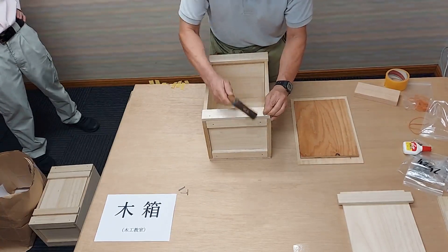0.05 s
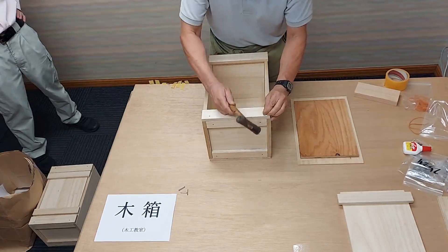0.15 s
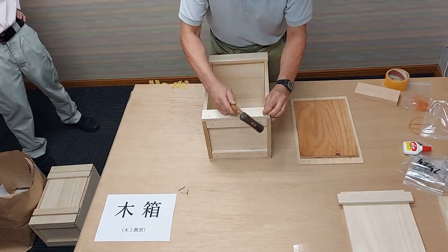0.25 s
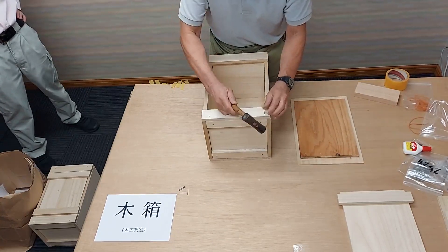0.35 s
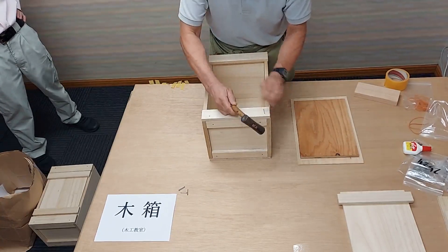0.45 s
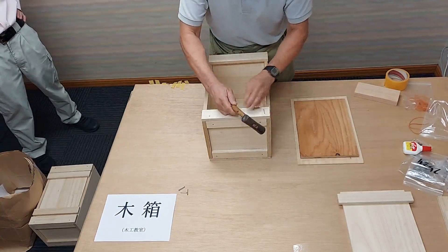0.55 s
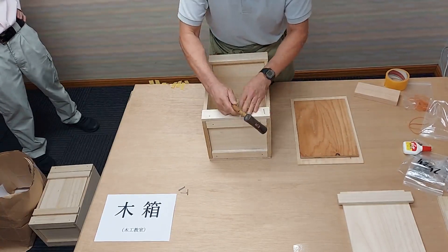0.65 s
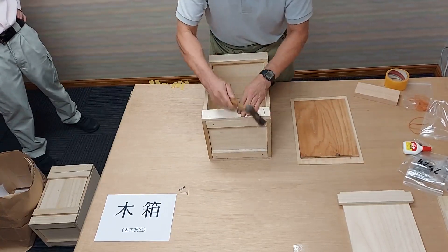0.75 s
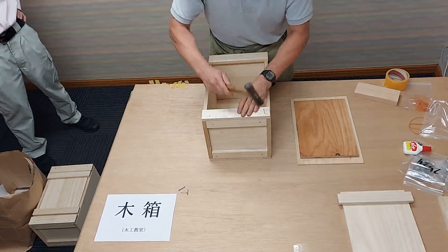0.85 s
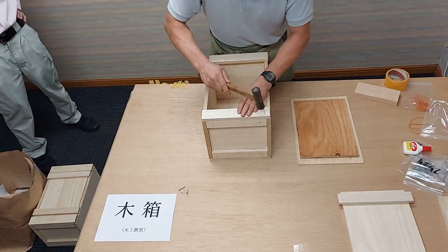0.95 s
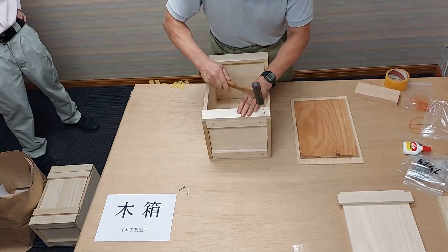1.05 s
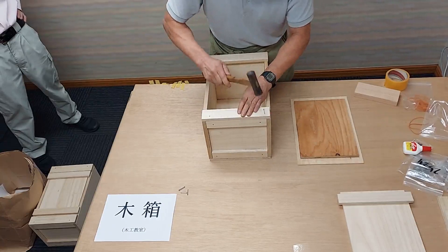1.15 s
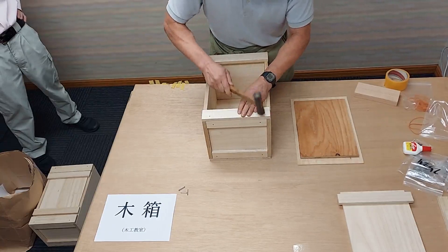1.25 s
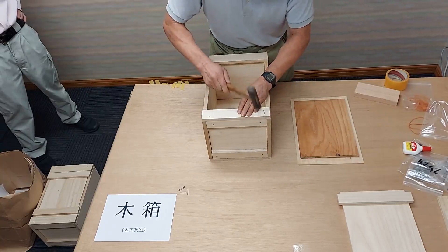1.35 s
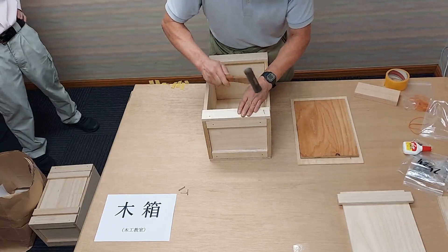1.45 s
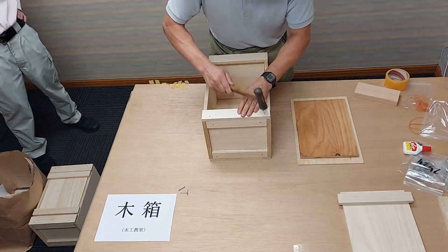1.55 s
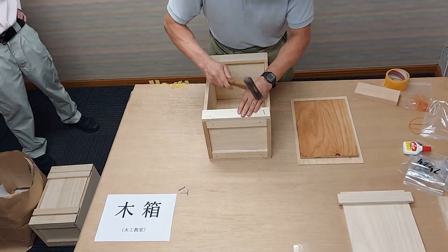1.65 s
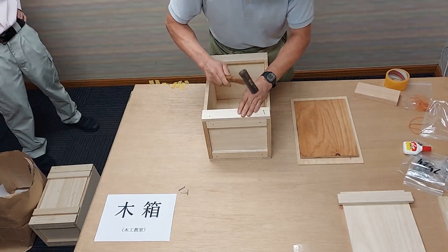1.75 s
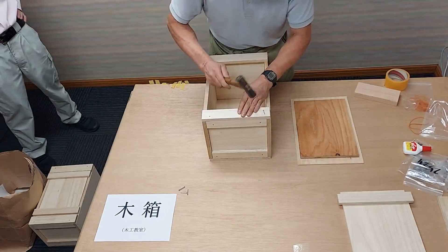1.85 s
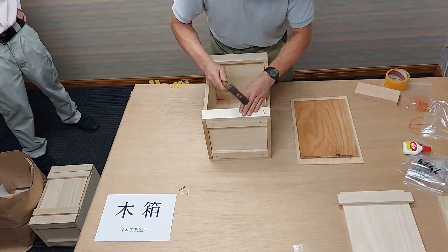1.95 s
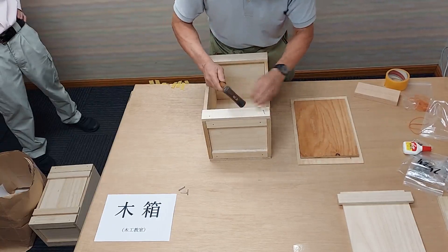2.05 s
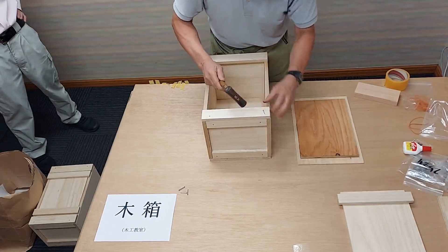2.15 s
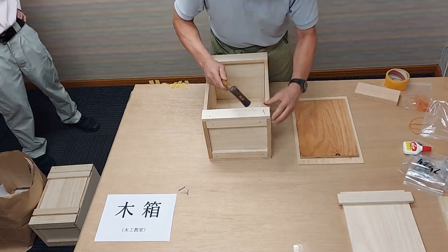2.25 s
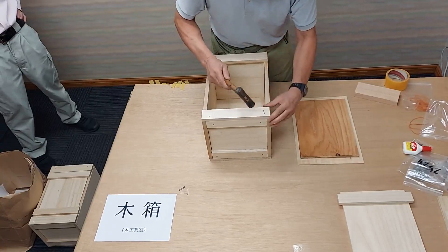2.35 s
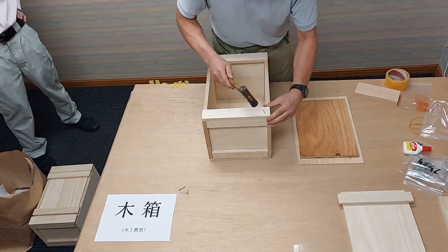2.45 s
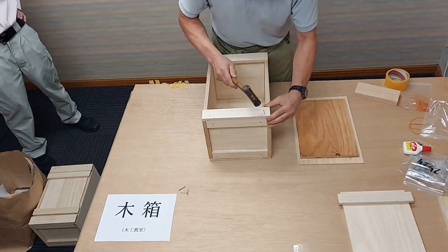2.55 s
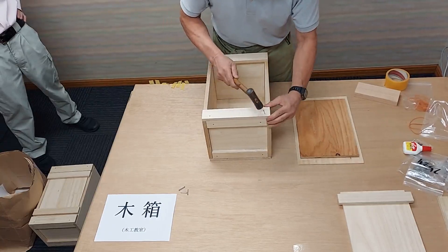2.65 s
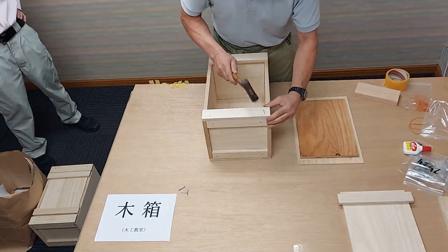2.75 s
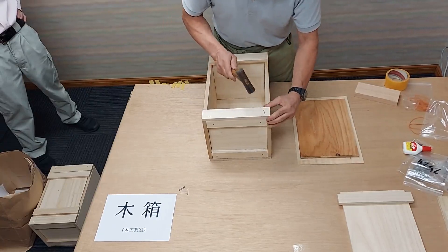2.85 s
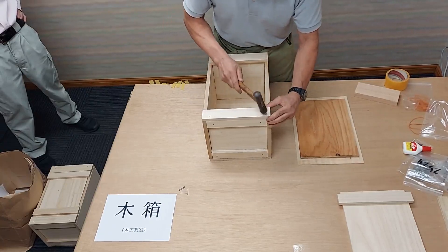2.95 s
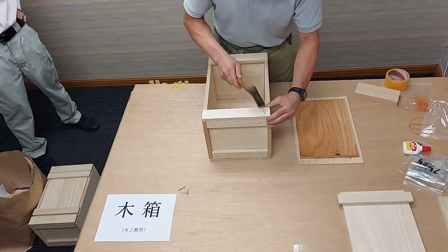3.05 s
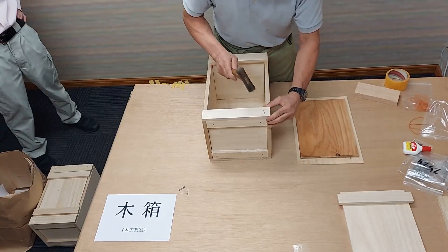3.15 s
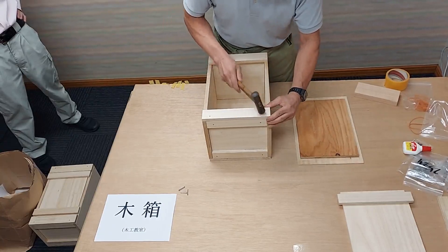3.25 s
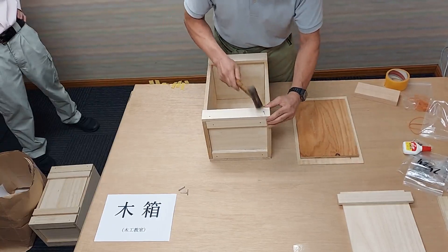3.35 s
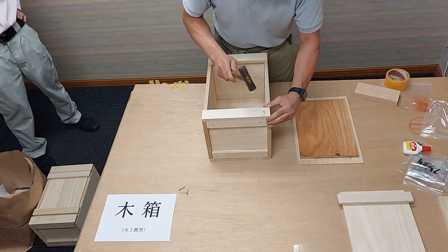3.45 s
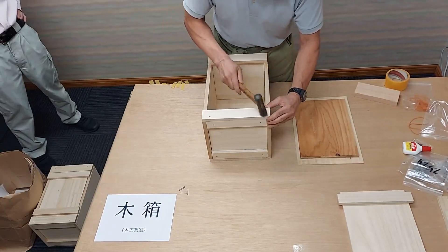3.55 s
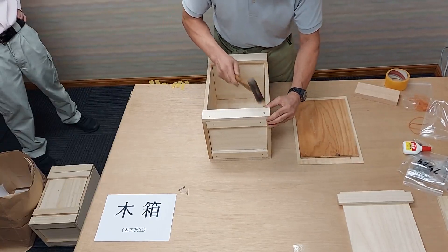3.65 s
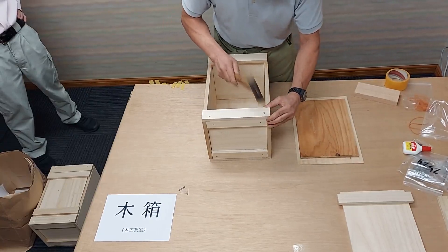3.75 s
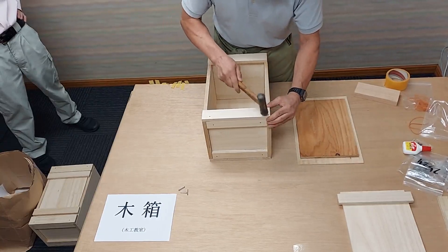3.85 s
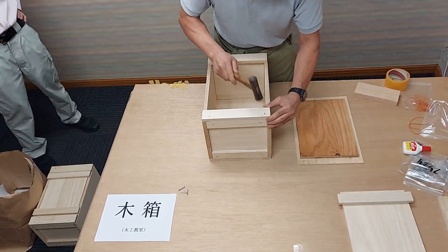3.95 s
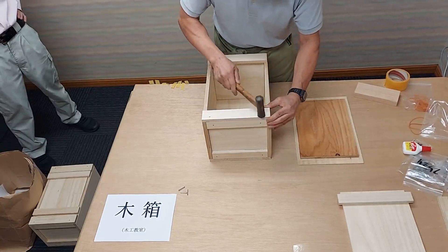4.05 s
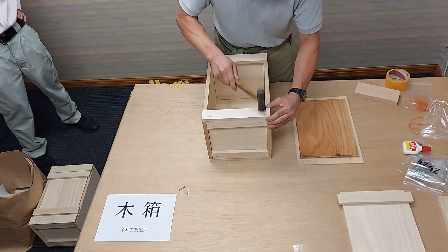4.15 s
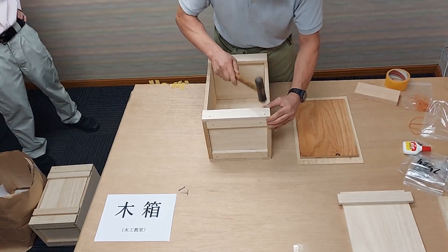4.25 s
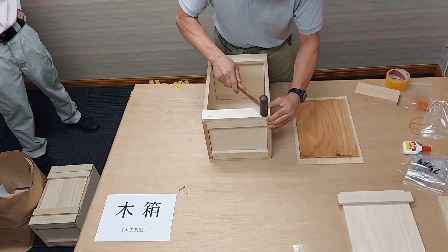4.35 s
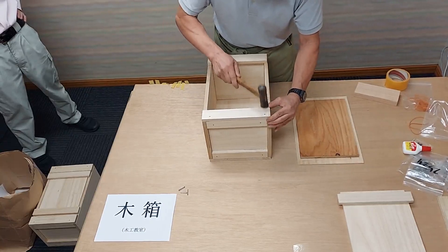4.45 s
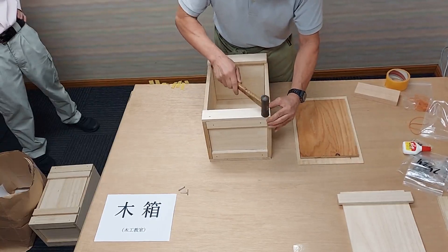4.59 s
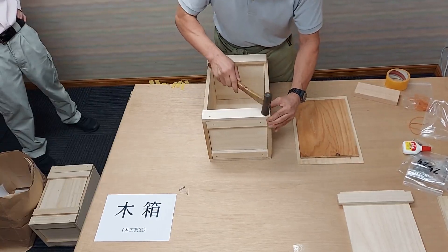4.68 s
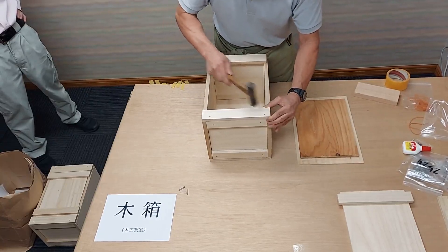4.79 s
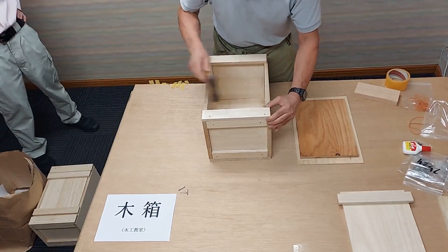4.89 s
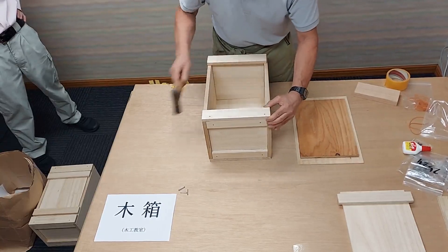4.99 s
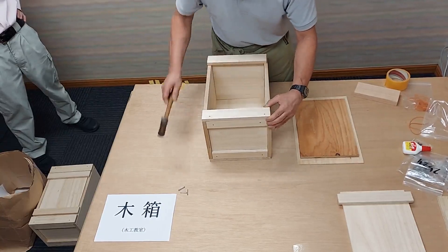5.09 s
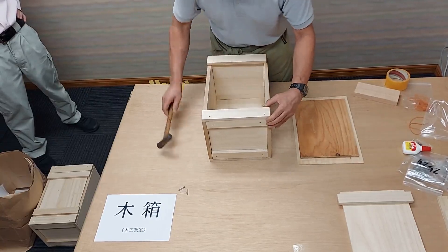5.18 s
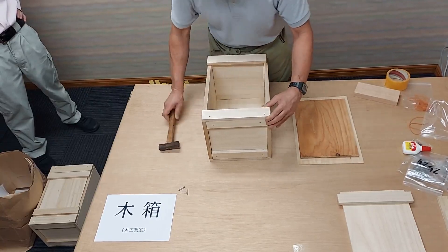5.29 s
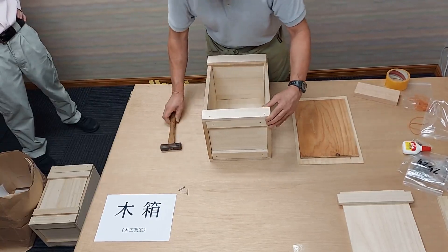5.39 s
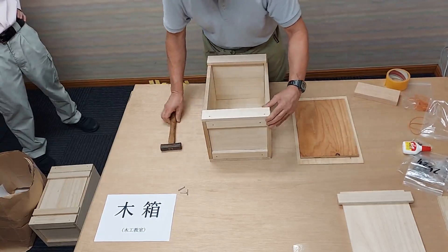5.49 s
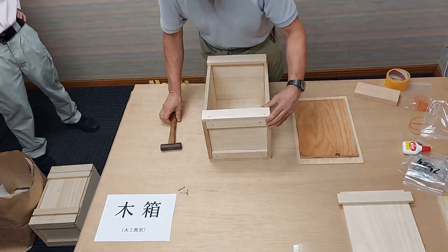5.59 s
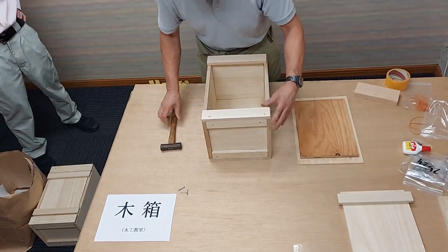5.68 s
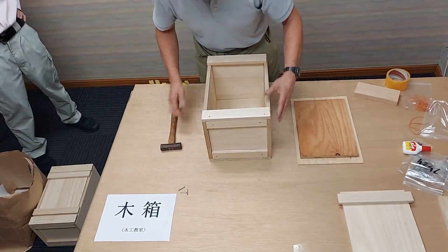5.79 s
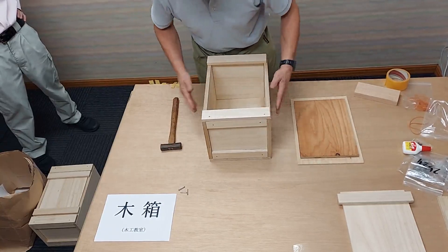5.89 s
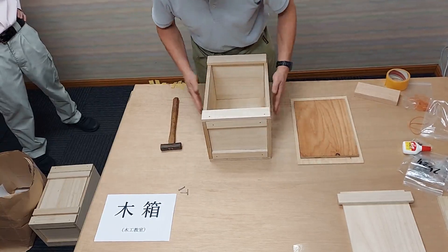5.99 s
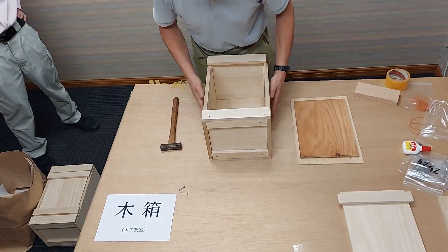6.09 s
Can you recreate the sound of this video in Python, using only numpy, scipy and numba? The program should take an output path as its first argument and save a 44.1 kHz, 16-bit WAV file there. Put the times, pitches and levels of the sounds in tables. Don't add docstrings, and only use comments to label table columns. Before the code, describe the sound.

In a small carpeted room, a table bump and soft handling come first, then two quick hammer blows on a hollow wooden box. After a pause with faint brushing, seven evenly spaced blows follow, cracking brightly and booming through the table. The hammer is then set down with a light double touch and a thud. A fan hums behind, dipping after loud hits; close stereo recorder.

```python
import sys
import numpy as np
from scipy import signal
from scipy.fft import rfft, irfft
from scipy.io import wavfile
from scipy.ndimage import uniform_filter1d
from numba import njit

SR = 44100
rng = np.random.default_rng(int(sys.argv[2]) if len(sys.argv) > 2 else 0)


def amplitude_ratio(level_db):
    exponent = np.asarray(level_db, float) / 20
    return 10 ** exponent


def transcribe(u):
    v = np.clip(np.atleast_2d(u).T, -1, 1)
    q = np.round(v * 32767).astype(np.int16)
    wavfile.write(sys.argv[1], SR, q)


N = 270112

# t/s, peak level/dB, table boom/dB, hollow box/dB, bright crack/dB
BLOWS = [
    (1.32, 0, -7.5, -1, 2.5),
    (1.61, -1, -5.5, -1, 2.5),
    (3.032, 0.5, -4, -4.5, 3.5),
    (3.332, 1, -4.5, -3, 4),
    (3.602, -0.5, -6.5, -3, 3.5),
    (3.861, -2, -5.5, 1, 3.5),
    (4.116, 1.5, -8.5, 5.5, 1),
    (4.381, 0.5, -10, -2, 3),
    (4.635, 1.5, -11, 6.5, 4),
]
# f/Hz, side minus middle level/dB
ROOM_SIDE = [(60, 5), (150, -9), (300, -12.5), (600, -1), (1200, -2), (3000, 0.5), (14000, 1.5)]
HZ = np.maximum(np.arange(2049) * SR / 4096, 20)
OPPOSITE = np.array([[1], [-1]])
BASS_LEAD = 0.38
BLOW_EARLY_S = 0.0004


def on_log(points, hz):
    p = np.array(points)
    return np.interp(np.log(hz), np.log(p[:, 0]), p[:, 1])


def causal(db):
    cep = irfft(db * np.log(10) / 20)
    half = len(cep) // 2
    cep = np.r_[cep[0], 2 * cep[1:half], np.zeros(half)]
    return irfft(np.exp(rfft(cep)))[:half]


def band(x, lo_hz, hi_hz):
    return signal.sosfilt(signal.butter(2, [lo_hz, hi_hz], "band", fs=SR, output="sos"), x)


def unit(x):
    return x / np.sqrt(np.sum(x ** 2))


def fade(t, t60):
    return np.exp(-np.log(1000) * t / t60)


def add(out, s, x):
    i = int(s * SR)
    out[..., i:i + x.shape[-1]] += x[..., :N - i]


def walk(rate):
    hold = int(SR / rate)
    steps = np.repeat(rng.standard_normal(500), hold)[:N]
    return 1.3 * uniform_filter1d(steps, hold)


def ducking():
    rest_db, duck_db, deepest_db = 11, 5.5, 19
    sink_s, recover_s = 0.13, 1.3
    since = np.maximum(np.arange(N) / SR - np.array(BLOWS)[:, :1], 0)
    dips = np.exp(-since / recover_s) * (1 - np.exp(-since / sink_s))
    drop = duck_db * np.sum(dips, axis=0)
    return rest_db - deepest_db * np.tanh(drop / deepest_db)


def rumble():
    # t/s, level/dB
    footsteps = [(0.0, -34), (0.15, -48), (0.251, -48), (0.796, -47.5), (0.96, -49.5), (1.15, -47.5),
                 (1.291, -52), (2.1, -61), (2.58, -56), (2.65, -61.5), (2.829, -64), (5.018, -56.5),
                 (5.47, -56.5), (5.71, -59), (6.1, -59.5)]
    building_db, swell_s = -69.5, 0.026
    t = np.arange(N) / SR
    turn = 2 * np.pi * np.cumsum(62 + 5 * walk(42)) / SR
    hum = np.sin(turn + BASS_LEAD * OPPOSITE) * amplitude_ratio(1.3 * walk(29))
    low = band(rng.standard_normal(N), 49, 140)
    steps = sum(amplitude_ratio(db) * np.exp(-((t - s) / swell_s) ** 2) for s, db in footsteps)
    steady = amplitude_ratio(building_db + ducking() + 3.1 * walk(16))
    return (hum + 0.43 * low / np.std(low)) * (steps + steady)


def fan():
    # f/Hz, level/dB per Hz
    air_colour = [(53, -25), (90, -3), (145, -21), (176, -10), (239, -11), (385, -11.5), (410, -9.5),
                  (467, -12), (647, -15.5), (1410, -23.5), (1570, -24), (2090, -37.5), (2380, -19.5),
                  (2830, -44.5), (16000, -55)]
    # f/Hz, level/dB
    whine_lines = [(414.5, -76.5), (635.2, -80), (877.5, -79), (1044, -83), (1464, -90.5), (1545, -72),
                   (2245, -88), (2293, -75), (2358, -79), (2433, -82.5), (2498, -83.5), (2552, -87.5)]
    air_db = -70
    hz = np.maximum(np.fft.rfftfreq(N, 1 / SR), 20)
    mid, side = irfft(rfft(rng.standard_normal((2, N))) * amplitude_ratio(on_log(air_colour, hz)), N)
    side = irfft(rfft(side) * amplitude_ratio(on_log(ROOM_SIDE, hz)), N)
    air = np.array([mid + side, mid - side]) * amplitude_ratio(air_db) / np.std(mid)
    t = np.arange(N) / SR
    for f, db in whine_lines:
        wobble = np.cumsum(3.2 * walk(50)) / SR
        start = rng.random((2, 1)) * min(f / 2000, 1)
        phase = 2 * np.pi * (f * t + wobble + start)
        air += amplitude_ratio(db - 1.5 + 2.2 * walk(74)) * np.sin(phase)
    return air * amplitude_ratio(ducking())


def room():
    # f/Hz, t60/s
    echo_t60 = [(60, 0.23), (130, 0.47), (350, 0.45), (920, 0.37), (2400, 0.29), (6400, 0.27),
                (14000, 0.18)]
    t = np.arange(SR) / SR
    cuts = 40 * 2 ** np.arange(0, 9, .5)
    tail = 0
    for lo, hi in zip(cuts[:-1], cuts[1:]):
        mid, side = band(rng.standard_normal((2, SR)), lo, hi)
        t60 = on_log(echo_t60, lo)
        wide = amplitude_ratio(on_log(ROOM_SIDE, max(lo, 150))) * OPPOSITE
        decay = fade(t, t60) + 3.8 * fade(t, 0.54 * t60)
        tail = tail + (mid + wide * side) * decay / np.sqrt(t60) * min(lo / 180, 1)
    tail = unit(tail * (1 - np.exp(-t / 0.0046)))
    tail[:, 0] -= amplitude_ratio(-21)
    return tail * amplitude_ratio(np.array([[.4], [-.4]]))


def wood():
    # f/Hz, level/dB, t60/s
    box_notes = [(295, -16, 0.27), (336.1, -14.5, 0.23), (419.3, -14, 0.18), (474.6, -7.5, 0.087),
                 (536, -0.5, 0.08), (628, -13.5, 0.22), (699.6, -0.5, 0.047), (879, -2, 0.045),
                 (926, -6, 0.08), (1042, -4.5, 0.081), (1095, -3, 0.031), (2130, -8.5, 0.1),
                 (5030, 3, 0.0068), (6780, -1, 0.031)]
    # f/Hz, level/dB, t60/s, split/Hz
    boom_pairs = [(62, -1.5, 0.27, 11), (82.1, -11.5, .4, 8), (98.73, 0.5, 0.22, 7.2),
                  (123.3, -4.5, 0.31, 7.6), (169.4, 1, 0.22, 7.7), (228.3, -8.5, 0.26, 12)]
    t = np.arange(SR // 2) / SR
    lead = rng.uniform(-1.3, 1, (len(box_notes), 2, 1))
    box = 0
    for (hz, db, t60), p in zip(box_notes, lead):
        box = box + amplitude_ratio(db) * np.sin(2 * np.pi * hz * t + .7 * p) * fade(t, t60)
    boom = 0
    for hz, db, t60, split_hz in boom_pairs:
        turn = 2 * np.pi * hz * t + BASS_LEAD * 65 / hz * OPPOSITE
        beat = np.pi * split_hz * t
        pair = np.sin(turn + beat) - .7 * np.sin(turn - beat)
        boom = boom + amplitude_ratio(db) * pair * fade(t, t60)
    return amplitude_ratio(-37.5) * box * (1 - np.exp(-t / .002)) + amplitude_ratio(-40.5) * boom


def contact(length, rattle_db, size):
    rattle = rng.standard_normal(size) * np.exp(-np.arange(size) / SR / length)
    return np.r_[1, amplitude_ratio(rattle_db) * unit(rattle)]


def taps(rows, below, above):
    out = np.zeros(N)
    for s, db, hz, length in rows:
        octaves = np.abs(np.log2(HZ / hz))
        colour = -np.where(HZ < hz, below, above) * octaves ** 2 / (octaves + 0.18)
        push = contact(length, -2, size=8000)
        add(out, s, amplitude_ratio(db + 38) * unit(signal.fftconvolve(push, causal(colour))))
    return out


def handling():
    # t/s, level/dB, centre f/Hz, contact
    # length/s
    thuds = [
        (0.002, -38, 122, 0.014),
        (0.221, -40, 170, 0.032),
        (0.738, -49.5, 173, 0.026),
        (2.047, -58.5, 180, .04),
        (2.540, -56.5, 180, 0.012),
        (5.434, -32, 237, 0.01),
        (5.688, -47, 196, 0.022),
    ]
    # t/s, level/dB, centre f/Hz, contact length/s
    knocks = [
        (0.343, -65.5, 500, 0.046),
        (2.545, -55.5, 479, 0.008),
        (5.351, -38.5, 390, 0.013),
        (5.377, -43.5, 387, 0.012),
        (5.433, -29, 646, 0.012),
        (5.686, -40.5, 920, 0.041),
    ]
    # t/s, level/dB, centre f/Hz, contact
    # length/s
    scuffs = [
        (0.001, -48.5, 1190, 0.0067),
        (0.002, -66.5, 6800, 0.045),
        (0.345, -78, 8950, 0.066),
        (0.74, -59, 1500, 0.04),
        (0.785, -78, 7000, .04),
        (1.892, -60, 1512, 0.079),
        (2.870, -60.5, 920, 0.11),
        (5.357, -69.5, 5000, 0.035),
        (5.434, -56, 1800, 0.032),
        (5.687, -50.5, 1900, 0.046),
    ]
    return taps(thuds, 21, 16) + taps(knocks, 8.1, 17.7) + taps(scuffs, 2.5, 17)


def steel():
    # t/s, f/Hz, level/dB, t60/s
    head_notes = [
        (3.034, 3370, -58, .6),
        (4.636, 3370, -48, .6),
        (5.690, 4060, -53, .17),
    ]
    out, t = np.zeros(N), np.arange(SR) / SR
    for s, hz, db, t60 in head_notes:
        note = np.sin(2 * np.pi * hz * t) * fade(t, t60)
        add(out, s, amplitude_ratio(db) * note * (1 - np.exp(-t / .005)))
    return out


def cracks():
    out, t = np.zeros((2, N)), np.arange(600) / SR
    burst = np.exp(-t / .0015) * (1 - np.exp(-t / .0005))
    for s, db in np.array(BLOWS)[:, :2]:
        mid, side = rng.standard_normal((2, len(t))) * burst
        chatter = np.array([mid + .6 * side, mid - .6 * side])
        add(out, s - BLOW_EARLY_S, amplitude_ratio(db - 3.5) * band(chatter, 3800, 8500))
    return out


def hammer():
    # f/Hz, level/dB per Hz
    blow_colour = [(30, -25.5), (60, -5.5), (160, -1), (300, -3.5), (700, -4.5), (1200, -7), (2200, -8),
                   (4500, -18), (8000, -25.5), (11000, -33), (15000, -29.5), (16800, -59.5)]
    overdrive_db, spot_db = 6, 1.8
    out, octaves = np.zeros(N), np.log2(HZ)
    hollow = np.exp(-((octaves - np.log2(460)) / .5) ** 2)
    hollow = hollow - .45 * np.exp(-((octaves - np.log2(800)) / .25) ** 2)
    for s, db, boom_db, hollow_db, crack_db in BLOWS:
        push = np.r_[amplitude_ratio(-18), np.zeros(52), contact(.014, -7, size=3000)]
        tilt = [(110, boom_db), (170, -6), (300, 0.7), (2000, -1.36), (5000, crack_db)]
        spot = np.interp(octaves, np.arange(8, 14, .2), rng.standard_normal(30)) * (HZ > 250)
        colour = on_log(blow_colour, HZ) + on_log(tilt, HZ)
        colour = colour + hollow_db * hollow + spot_db * spot
        blow = unit(np.convolve(push, causal(colour)))
        add(out, s - BLOW_EARLY_S, amplitude_ratio(db + overdrive_db + 23.5) * blow)
    return out


def scene():
    blows, soft = hammer(), handling()
    tap_ring_db, tap_direct_db = -16.5, -13
    wet = signal.fftconvolve((blows + soft)[None], room(), axes=1)[:, :N]
    ring = signal.fftconvolve((blows + amplitude_ratio(tap_ring_db) * soft)[None], wood(), axes=1)[:, :N]
    return wet + ring + amplitude_ratio(tap_direct_db) * soft + cracks() + steel() + fan() + rumble()


@njit
def limiter(x, top, attack, release):
    out, e = np.empty_like(x), 0.
    for i in range(x.shape[1]):
        a = max(abs(x[0, i]), abs(x[1, i]))
        e += (a - e) * (attack if a > e else release)
        out[:, i] = x[:, i] * min(1., top / (e + 1e-9))
    return out


def roll_off(x):
    return signal.sosfilt(signal.butter(12, 16750, fs=SR, output="sos"), x)


def record(dry):
    attack_s, release_s = 0.00058, 0.054
    held = limiter(dry, 0.57, 1 / (attack_s * SR), 1 / (release_s * SR))
    rounded = np.tanh(held * 1.091)
    top_cut = signal.butter(12, 15000, fs=SR, output="sos")
    return roll_off(signal.sosfilt(top_cut, rounded))


dry = scene()
out = record(dry)
transcribe(out)
```